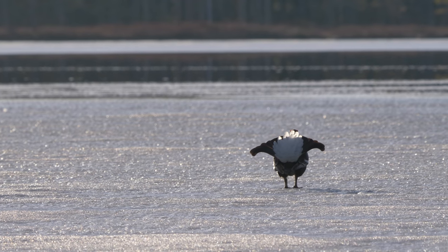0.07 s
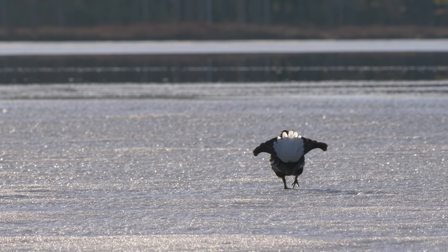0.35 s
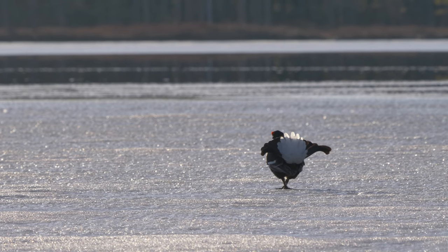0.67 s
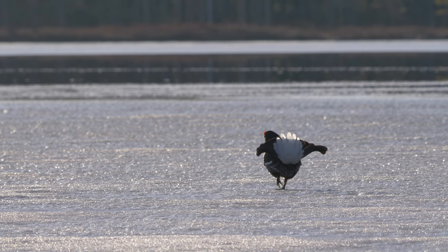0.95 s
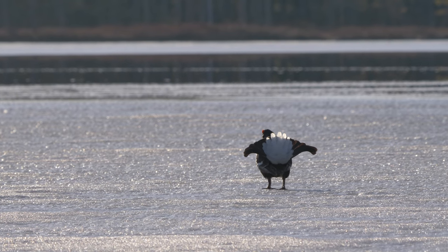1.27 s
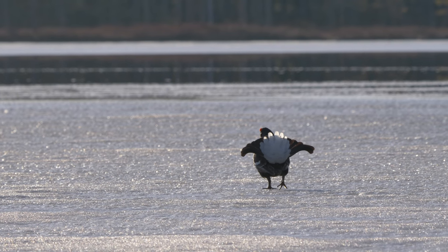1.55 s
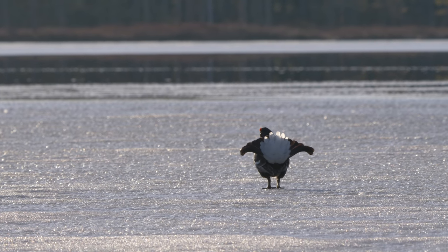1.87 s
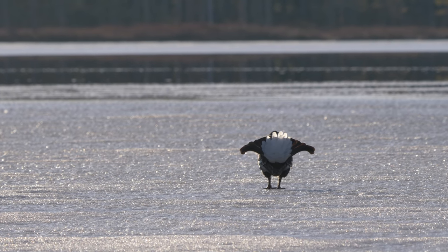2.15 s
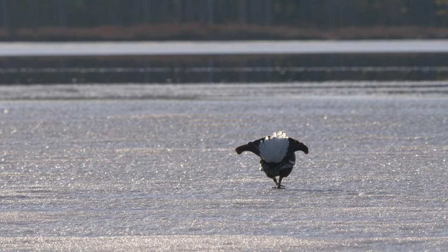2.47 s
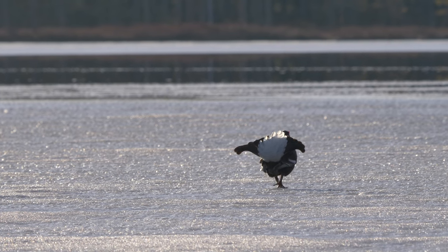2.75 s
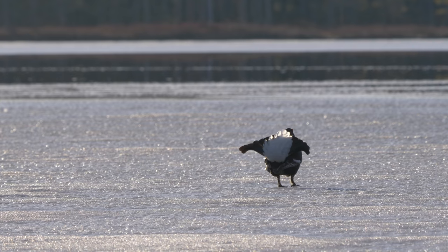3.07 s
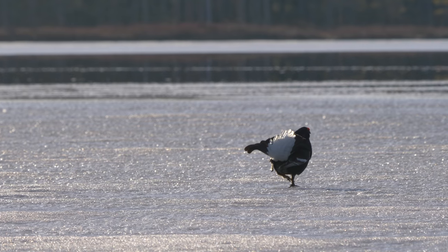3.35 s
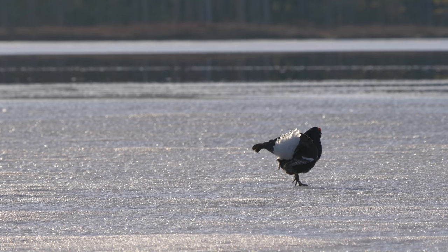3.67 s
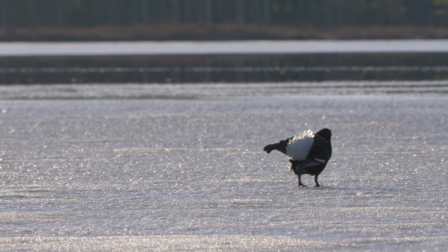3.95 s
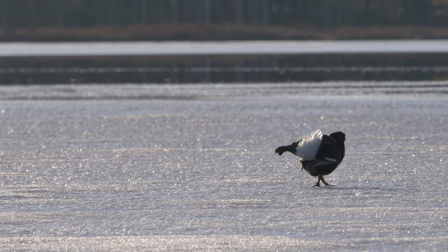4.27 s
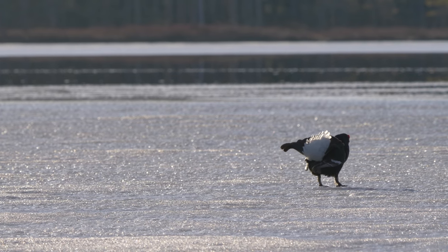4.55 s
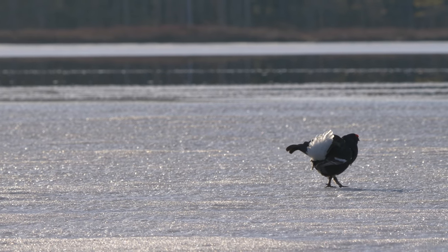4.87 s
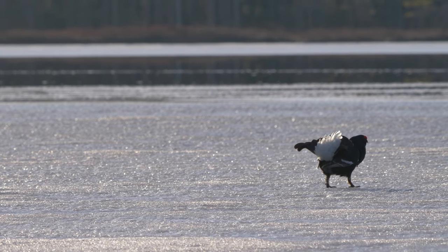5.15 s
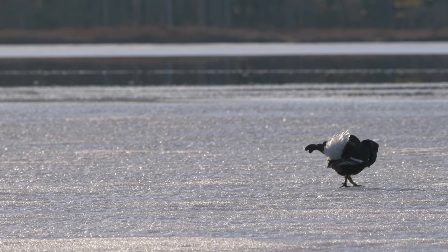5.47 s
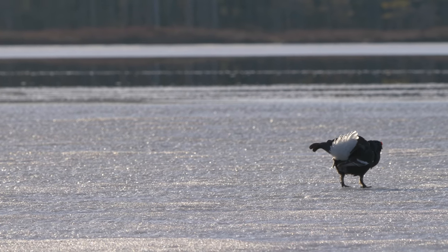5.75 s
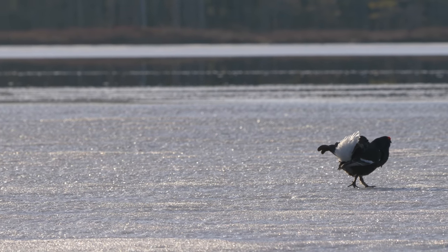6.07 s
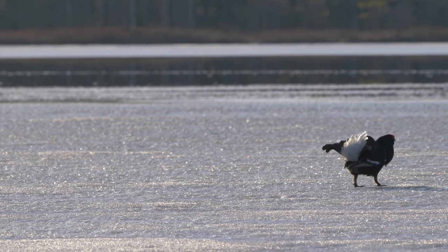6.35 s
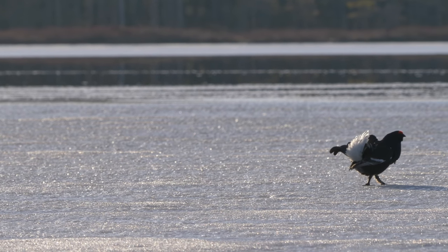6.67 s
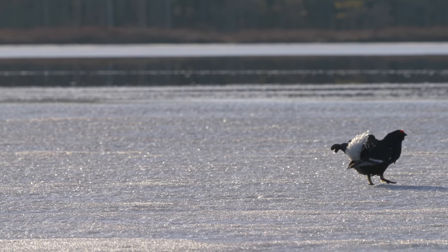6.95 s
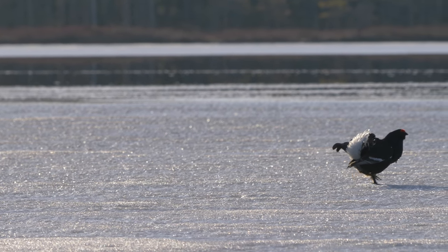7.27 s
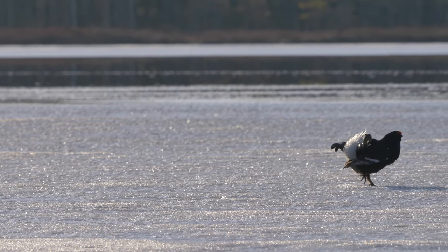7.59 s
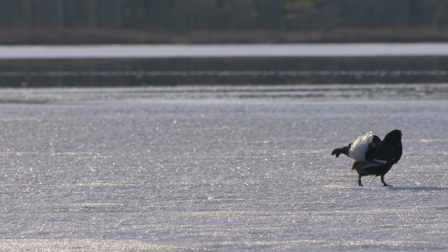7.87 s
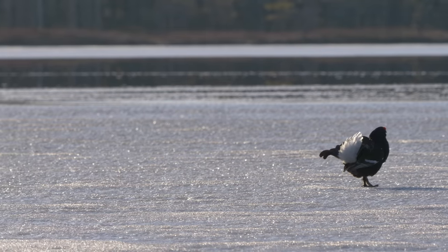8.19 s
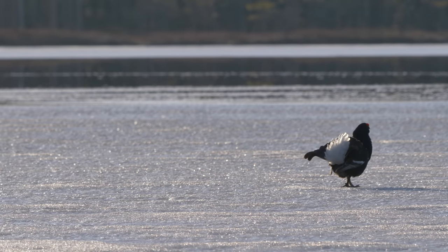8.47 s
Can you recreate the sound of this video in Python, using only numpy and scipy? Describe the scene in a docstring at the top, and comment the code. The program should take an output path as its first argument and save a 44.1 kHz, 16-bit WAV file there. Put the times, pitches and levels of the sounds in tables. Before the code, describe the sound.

A black grouse bubbles and coos continuously outdoors, a farther one answering, with faint small birds and a rival's brief hiss and cackle.

```python
"""A frozen bog ringed by trees, with a black grouse strutting almost straight ahead of a stereo pair.
His song bubbles as it sweeps through the resonance of his inflated neck: a run-up of ticking coos
swells into a set flourish of arching notes. A second cock, farther off, sings it in turn with him.
Other cocks murmur far away; near the end a rival hisses and cackles. Small birds whistle over
a low distant drone and faint air noise, and a few soft thuds land on the microphone."""
import sys
import numpy as np
from scipy import signal
from scipy.fft import rfft, irfft, next_fast_len
from scipy.io import wavfile
from scipy.ndimage import map_coordinates

SR = 44100
rng = np.random.default_rng(int(sys.argv[2]) if len(sys.argv) > 2 else 0)


def materialize(psi):
    """Save the field psi as 16-bit PCM at rate SR to the path in sys.argv[1].

    A 1-D psi becomes a single channel; in a 2-D psi each row is a channel.
    """
    bounded = np.clip(np.atleast_2d(psi).T, -1, 1)
    quanta = np.round(bounded * 32767).astype(np.int16)
    wavfile.write(sys.argv[1], SR, quanta)


N = 375732


def grouse(neck_hz=460.4, width_hz=51.4, ring_gain=2.25):
    """Each coo swells in the neck's resonance, whose ring beats against the glide and makes it bubble."""
    out = np.zeros(N)
    for start, *shape, db in stray_coos() + flourishes() + run_ups() + roll():
        add(out, start, amp(db) * coo(*shape))
    ring = lambda hz: 1j * hz * width_hz / (neck_hz ** 2 - hz ** 2 + 1j * hz * width_hz)
    return air_sac(filtered(out, lambda hz: 1 + ring_gain * ring(hz)))


def coo(length, start_hz, top_hz, end_hz, rise_s=0.04, fall_s=0.0387, tremble_db=1.77):
    """A nearly pure, trembling note; its pitch glides toward the top, then away to the end pitch."""
    t = np.arange(round(length * SR)) / SR
    ramp = lambda u: np.clip(u, 0, 1)
    glide_in = (top_hz - start_hz) * ramp(1 - t / rise_s) ** 2
    glide_out = (top_hz - end_hz) * ramp(1 - (length - t) / fall_s) ** 2
    tremble = wobble(len(t), rate=219)
    pitch = (top_hz - glide_in - glide_out) * (1 - 0.013 * tremble)
    phase = 2 * np.pi * (np.cumsum(pitch) / SR + rng.random())
    attack = ramp(t / min(0.014, 0.18 * length))  # short coos start faster
    release = ramp((length - t) / 0.011)
    return attack * release * amp(tremble_db * tremble) * np.sin(phase)


def air_sac(x, cutoff_hz=770):
    """The inflated neck passes the fundamental and little above it."""
    return filtered(x, lambda hz: 1 / np.sqrt(1 + (hz / cutoff_hz) ** 12))


def flourishes():
    """The coos of the closing figure, sung in turn by the farther cock and the near one."""
    # Each row: seconds into the figure, length in seconds, start, top and end pitch in Hz, level in dB.
    figure = [(0.0, 0.0846, 479.5, 536.2, 395, -37), (0.146, 0.0393, 620, 518, 476, -34.5),
              (0.251, 0.083, 317, 540.6, 349, -38), (0.35, 0.069, 342, 526, 309, -40),
              (0.425, 0.164, 431.5, 524, 333, -41), (0.69, 0.0288, 475, 530, 568, -34.5),
              (0.715, 0.0484, 415, 543.3, 474, -32.7), (0.767, 0.0604, 343, 580, 437, -37.5),
              (0.872, 0.027, 574, 580, 528, -25.5), (0.946, 0.06, 496, 593, 469, -27.8),
              (1.023, 0.055, 388, 555, 389, -35.5), (1.096, 0.062, 580, 520, 363, -37.5),
              (1.167, 0.0467, 514, 376, 436, -42)]
    # Each row: start in seconds, stretch of the spacing as a factor, gain in dB.
    turns = [(2.077, 1.013, -11.5), (3.776, 0.99, 0), (5.857, 1.0, -11.5), (7.341, 1.005, -.3)]
    coos = []
    for start, stretch, gain_db in turns:
        coos += [(start + stretch * offset, *shape, gain_db + db) for offset, *shape, db in figure]
    return coos


def run_ups(end_hz=332.4, scatter_db=1.6):
    """Evenly spaced ticks grow into full coos ahead of each flourish."""
    # Each row: time of the last coo in seconds, coo count, spacing in seconds, gain in dB, pitch factor.
    runs = [(1.751, 18, 0.085, -11.5, 0.91), (3.531, 15, 0.072, -0.9, 0.93), (5.53, 6, .0725, -11.5, 0.96),
            (7.087, 13, 0.073, -1.5, 1.01)]
    # How a run grows. Each row: seconds before the last coo, length in seconds, top in Hz, level in dB.
    crescendo = [(0, 0.0464, 580.3, -37), (.08, .058, 579.2, -35), (0.149, 0.0584, 545.8, -36.5),
                 (.24, 0.0386, 520, -38.5), (.45, 0.0351, 523, -43.5), (1.204, 0.0332, 540, -45)]
    lead, *growth = np.transpose(crescendo)
    coos = []
    for last, count, spacing, gain_db, pitch_factor in runs:
        for before in spacing * np.arange(round(count)):
            length, top_hz, db = (np.interp(before, lead, column) for column in growth)
            top_hz *= pitch_factor + 0.016 * rng.normal()
            db += gain_db + scatter_db * rng.normal()
            coos.append((last - before, length, top_hz, top_hz, end_hz, db))
    return coos


def roll(start_s=5.006, count=9, spacing_s=0.079, length_s=0.0705, start_hz=404, end_hz=332.4):
    """One flourish rolls on in even arches that climb and grow."""
    coos = []
    for t in spacing_s * np.arange(count):
        top_hz = 513.3 + 73 * t
        db = -43.5 + 4 * t + 1.6 * rng.normal()
        coos.append((start_s + t, length_s, start_hz, top_hz, end_hz, db))
    return coos


def stray_coos():
    """Single coos dropped in and around the phrases."""
    # Each row: start and length in seconds, start, top and end pitch in Hz, level in dB.
    strays = [(.159, 0.024, 567, 534, 434, -49), (.263, 0.065, 543, 395, 374, -49.5),
              (.326, 0.016, 515, 490, 366, -45.5), (.871, .053, 458, 605, 359.3, -32.5),
              (1.337, 0.017, 470, 490, 383, -44.5), (1.845, 0.018, 475, 480, 360, -42.5),
              (2.303, 0.059, 515, 411, 373, -46), (5.125, .024, 574, 585, 504, -32.5),
              (5.68, 0.052, 522, 494, 353, -41), (5.843, 0.057, 448, 518.5, 398, -37),
              (7.208, 0.025, 600, 570, 380, -49), (7.392, 0.057, 460, 421, 420, -38),
              (7.68, .035, 441, 438, 392, -41.5)]
    return list(strays)


def rival_hiss(attack_db=12.5):
    """Air hisses in two parts through a rival's gliding throat resonance."""
    # Each row: start, attack and hold in seconds, fade in dB a second, level in dB, start and end in Hz.
    hisses = [(7.669, 0.0413, 0.059, 204, -47.5, 1672, 1381), (7.92, 0.0578, 0.0356, 49, -49, 1350, 1534)]
    t, out = np.arange(N) / SR, np.zeros(N)
    # a narrow whistling core inside a wider rush, both riding on the resonance
    rush = lambda: band(0, width_hz=190) + amp(-7) * band(0, width_hz=480)
    for start, attack, hold, fade, db, start_hz, end_hz in hisses:
        onset_db = attack_db * np.maximum(0, 1 - (t - start) / attack)
        fade_db = fade * np.maximum(0, t - start - attack - hold)
        throat_hz = np.interp(t, [start, start + attack + hold], [start_hz, end_hz])
        phase = 2 * np.pi * np.cumsum(throat_hz) / SR
        out += amp(db - onset_db - fade_db) * unit(rush() * np.sin(phase) + rush() * np.cos(phase))
    # the bill opens on the second part and lets a higher resonance out
    opening = np.interp(t, [7.95, 8.27, 8.37], [0, 1, 0])
    return out + amp(-64) * opening * band(centre_hz=2900, width_hz=960)


def rival_cackle():
    """Short nasal clucks, each rasping with a fast, uneven shake."""
    # Each row: time in seconds, relative level in dB, second harmonic in Hz.
    clucks = [(7.691, -44.5, 855), (7.867, -43.5, 937), (8.011, -46, 930), (8.032, -50.5, 974),
              (8.059, -49, 943), (8.09, -44, 1032), (8.128, -43.5, 915), (8.159, -47.5, 868),
              (8.194, -43, 967), (8.246, -40.5, 950)]
    out = np.zeros(N)
    for when, db, harmonic_hz in clucks:
        pitches = harmonic_hz / 2 * np.array([1.07, 1.04, .92])
        cluck = note(0.034, *pitches, overtones_db=(0, -9, -18), flutter_db=5.0, waver=0.062)
        rasp = 1 + 0.47 * wobble(len(cluck), rate=502)
        add(out, when - .005, amp(db - 3.5) * rasp * cluck)
    return out


def small_birds():
    """Thin whistles and ticks in the distance, no two quite at the same pitch."""
    # Each row: start in seconds, note count, spacing and length in seconds,
    # start, middle and end pitch in Hz, level in dB.
    phrases = [(3.241, 2, .027, 0.0056, 1880, 3280, 4820, -58),
               (3.318, 1, .1, 0.0076, 1930, 3200, 5050, -58.5),
               (3.324, 1, .1, 0.027, 5240, 4530, 4470, -68.5),
               (5.348, 1, 0.12, 0.061, 2870, 2260, 2130, -66),
               (5.927, 4, 0.127, 0.048, 3590, 3120, 2980, -73.5),
               (6.469, 3, 0.23, 0.046, 2455, 2800, 3350, -66),
               (6.513, 3, .212, 0.033, 3200, 2740, 2280, -67.5),
               (7.043, 3, .07, 0.07, 3250, 3010, 2650, -71.5),
               (7.22, 3, 0.055, 0.074, 2890, 2650, 2280, -69),
               (7.971, 3, 0.066, .05, 3026, 2920, 2740, -67.5),
               (8.224, 1, 0.094, 0.11, 3000, 2410, 2290, -65)]
    out = np.zeros(N)
    for start, count, spacing, length, *contour_hz, db in phrases:
        for k in range(round(count)):
            pitches = np.array(contour_hz) * (1 + 0.015 * rng.normal())
            add(out, start + k * spacing, amp(db) * note(length, *pitches, flutter_db=4.0, waver=0.018))
    return out


def far_cocks(count=70, level_db=-57, spread_db=2):
    """The rest of the lek, blurred by distance into a murmur."""
    out = np.zeros(N)
    for when, pitch, size in rng.random((count, 3)):
        hz = 370 + 110 * pitch
        add(out, when * N / SR, amp(level_db + spread_db * size) * note(.06, hz, hz * 1.06, hz * 0.81))
    return air_sac(out)


def note(length, start_hz, middle_hz, end_hz, overtones_db=(), flutter_db=0, waver=0):
    """One puff through the syrinx: pitch curves through three points; level rises, flutters and falls."""
    u = np.linspace(0, 1, max(8, round(length * SR)))
    flutter = wobble(len(u), rate=150)
    arch = np.polyfit([0, .5, 1], [start_hz, middle_hz, end_hz], 2)
    pitch = np.polyval(arch, u) * (1 - waver * flutter)
    phase = 2 * np.pi * (np.cumsum(pitch) / SR + rng.random())
    tone = np.sin(phase) + sum(amp(db) * np.sin(k * phase) for k, db in enumerate(overtones_db, 2))
    return np.sin(np.pi * u) * amp(flutter_db * flutter) * tone


def forest_edge(x, t60_s=.65):
    """A faint diffuse answer from the trees round the bog."""
    t = np.arange(SR) / SR
    tail = rng.standard_normal(SR) * amp(-60 * t / t60_s) * (1 - np.exp(-t / 0.015))
    return signal.fftconvolve(x, tail / np.linalg.norm(tail))[:N]


def microphone_thuds(rise_s=0.031):
    """Brief low bumps on the microphone that die quickly."""
    # Each row: start in seconds, relative level in dB.
    bumps = [(.106, -50), (4.428, -41.5), (4.91, -53), (5.528, -51), (6.182, -46), (7.701, -49),
             (7.93, -53)]
    envelope = np.zeros(N)
    u = np.arange(SR // 2) / SR / rise_s
    for start, db in bumps:
        add(envelope, start, amp(db) * u * np.exp(-u))
    return envelope * band(centre_hz=42, width_hz=75)


def open_air():
    """Faint air noise, alike at both microphones in the bass and wide in the treble."""
    # Each row: frequency in Hz, relative noise density in dB.
    spectrum = [(20, -8), (90, -1), (200, -4.5), (400, 6), (700, -7), (900, -13), (1200, -11), (1600, -18),
                (3000, -21.5), (6000, -25.5), (15000, -29)]
    # Each row: frequency in Hz, correlation of left and right.
    likeness = [(100, 0.86), (500, 0.62), (1200, 0.64), (2500, 0.23), (5000, 0.028)]

    def mid_and_side(hz):
        angle = np.arccos(np.clip(along(likeness, hz), -1, 1)) / 2
        return amp(along(spectrum, hz)) * [np.cos(angle), np.sin(angle)]

    mid, side = filtered(rng.standard_normal((2, N)), mid_and_side)
    return unit(np.array([mid + side, mid - side]))


def far_drone():
    """A low drone in the distance, heard as a few narrow bands of noise."""
    # Each row: centre and width in Hz, relative level in dB.
    bands = [(130.9, 25.5, -4.5), (254.4, 33.6, -5), (289.5, 18.3, -2.5), (398, 93, -4.5)]
    return sum(amp(db) * band(hz, width) for hz, width, db in bands)


def amp(db):
    """Decibels to gain."""
    return 10 ** (np.asarray(db) / 20)


def unit(x):
    """Scaled to rms 1."""
    return x / np.sqrt(np.mean(x ** 2) + 1e-20)


def along(points, hz):
    """Interpolate (Hz, value) points on a log frequency axis."""
    knots_hz, values = np.transpose(points)
    return np.interp(np.log(hz + 1), np.log(knots_hz + 1), values)


def filtered(x, response):
    """x shaped by a response given as a function of Hz."""
    size = next_fast_len(N + SR // 2)
    return irfft(rfft(x, size) * response(np.fft.rfftfreq(size, 1 / SR)), size)[..., :N]


def band(centre_hz, width_hz):
    """Noise of rms 1 in one steep-sided resonance."""
    resonance = lambda hz: 1 / (1 + (2 * (hz - centre_hz) / width_hz) ** 2)
    return unit(filtered(rng.standard_normal(N), resonance))


def wobble(size, rate):
    """A smooth random curve, rate knots a second."""
    return map_coordinates(rng.standard_normal(64), [np.arange(size) * rate / SR], mode="mirror")


def add(track, start_s, sound):
    """Mix a sound into the track."""
    part = track[max(0, round(start_s * SR)):][:len(sound)]
    part += sound[:len(part)]


def scene():
    """The birds stand almost straight ahead; the distant ones draw more answer from the trees."""
    near = grouse() + rival_hiss() + rival_cackle()
    far = small_birds() + far_cocks()
    birds = near + far + forest_edge(amp(-17) * near + amp(-5.5) * far)
    balance = amp([[-.3], [.3]])  # a touch to the right
    return balance * birds + microphone_thuds() + amp(-54.5) * (open_air() + far_drone())


def record(dry):
    """The recorder keeps nothing above 15.7 kHz."""
    return filtered(dry, lambda hz: hz < 15700)


dry = scene()
out = record(dry)
materialize(out)
```